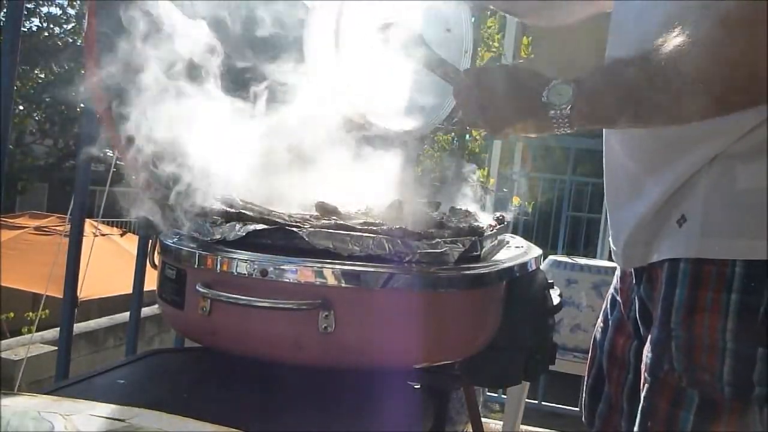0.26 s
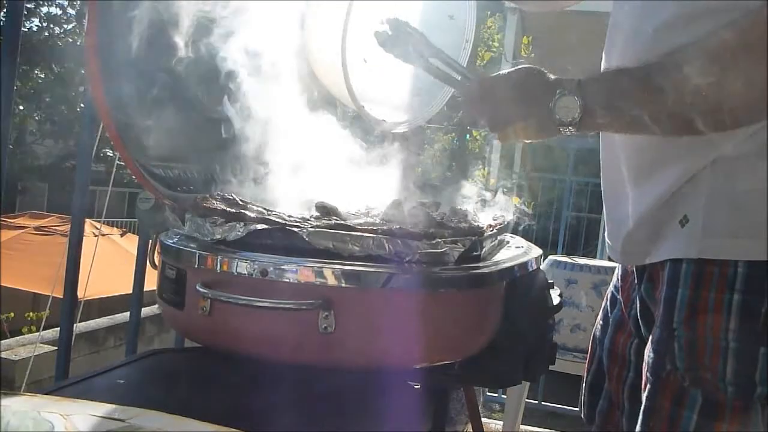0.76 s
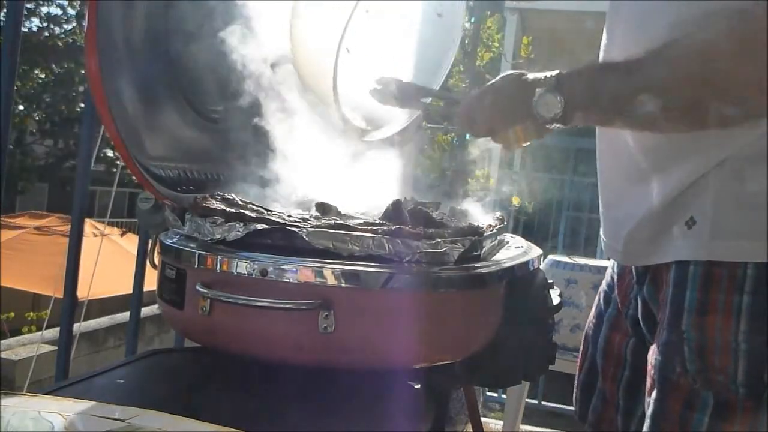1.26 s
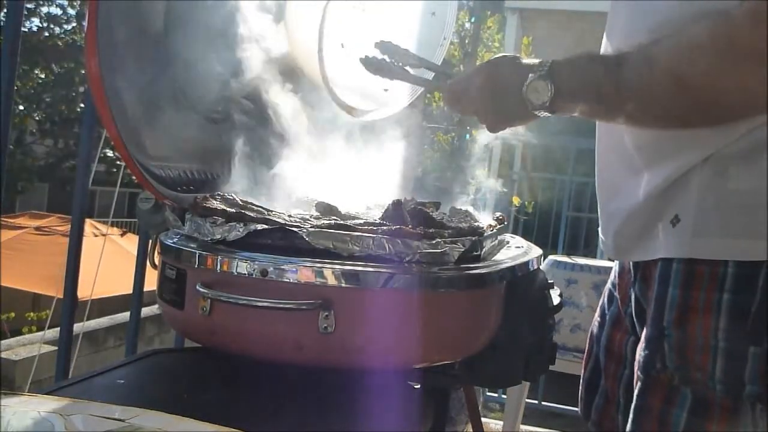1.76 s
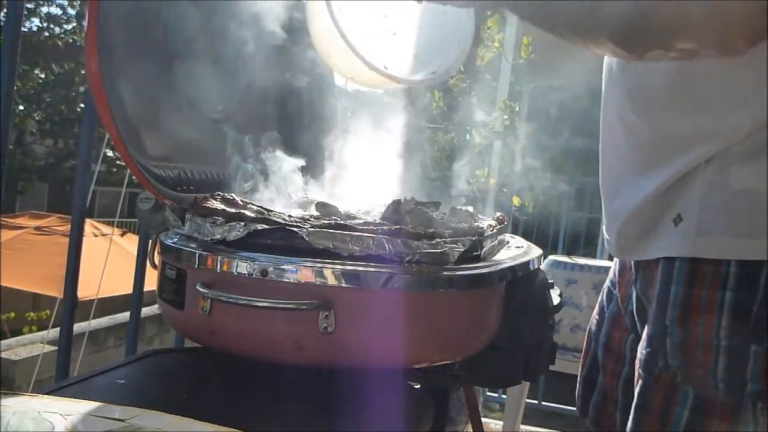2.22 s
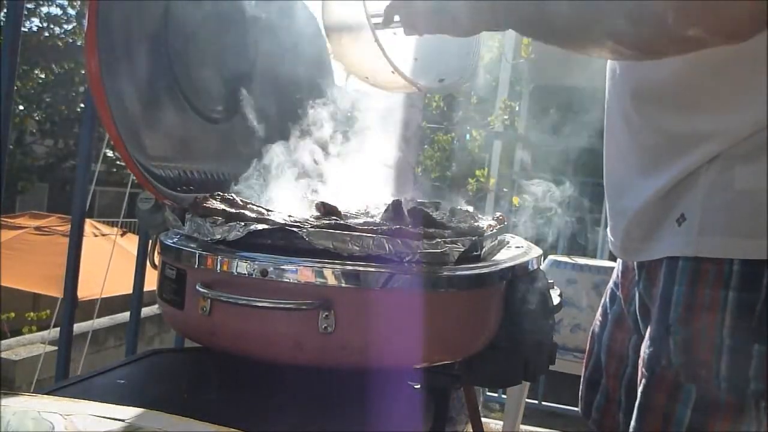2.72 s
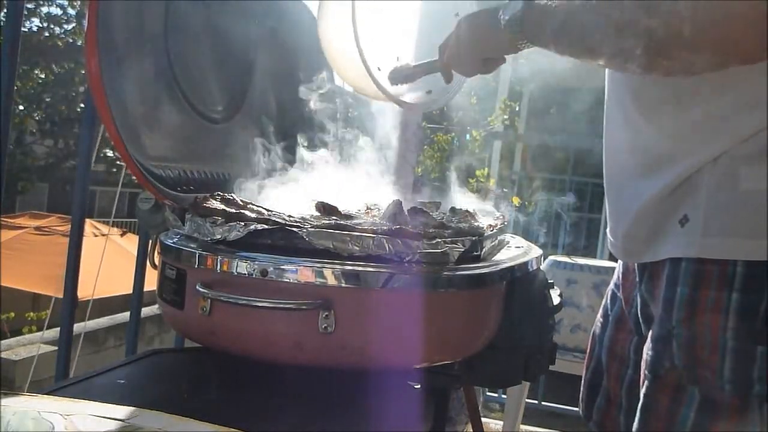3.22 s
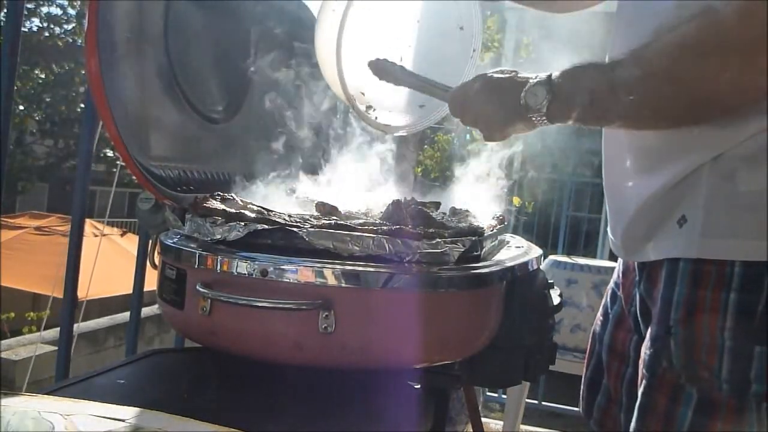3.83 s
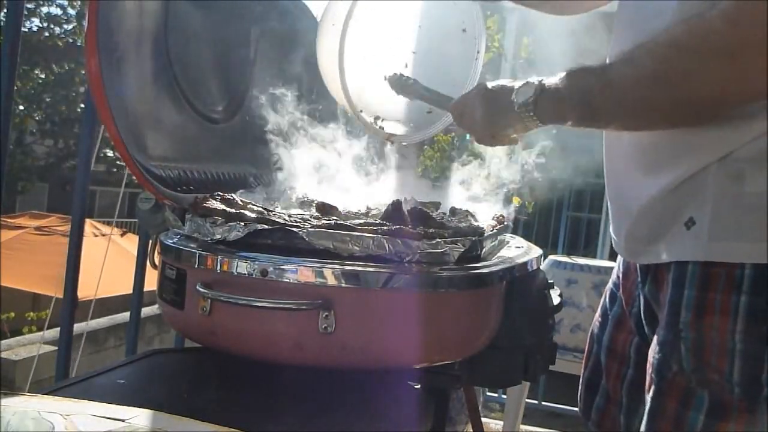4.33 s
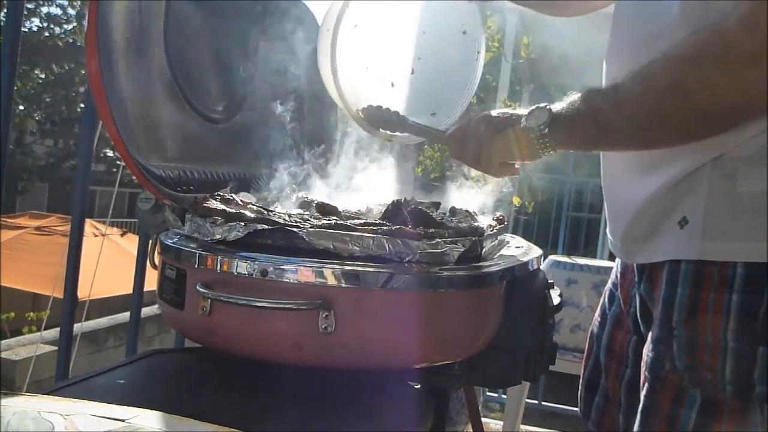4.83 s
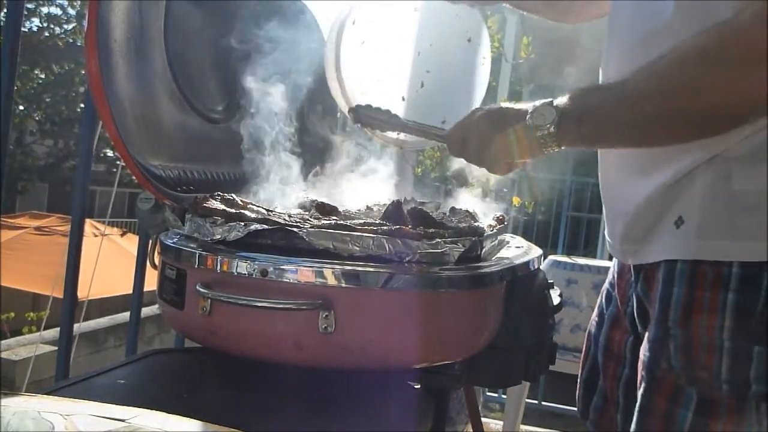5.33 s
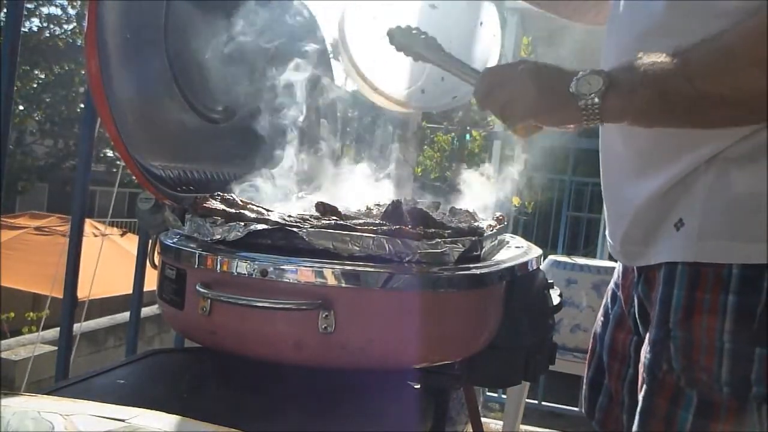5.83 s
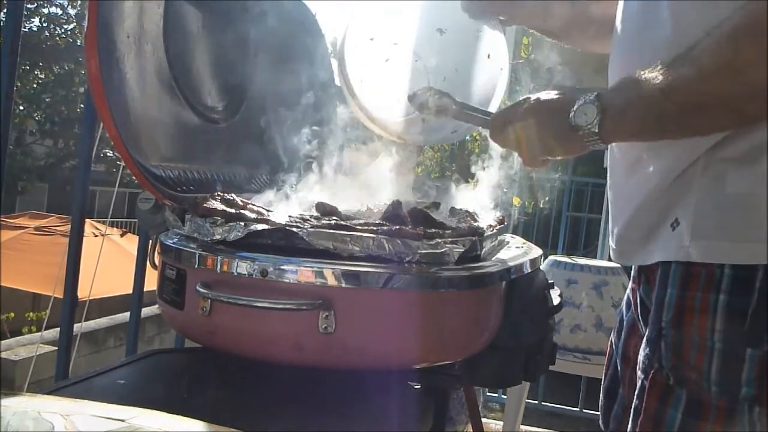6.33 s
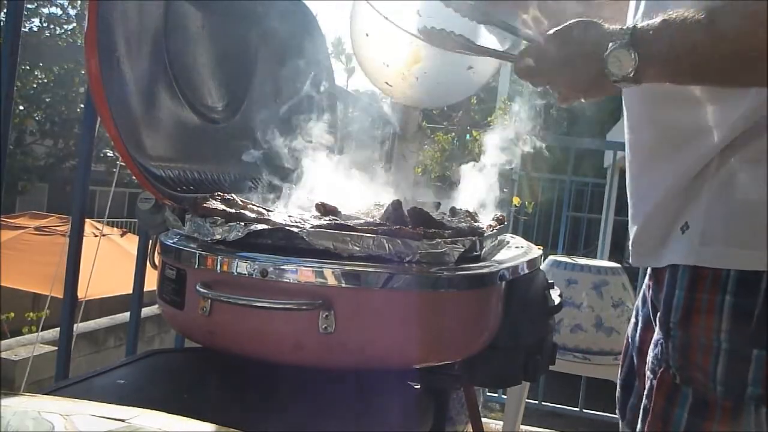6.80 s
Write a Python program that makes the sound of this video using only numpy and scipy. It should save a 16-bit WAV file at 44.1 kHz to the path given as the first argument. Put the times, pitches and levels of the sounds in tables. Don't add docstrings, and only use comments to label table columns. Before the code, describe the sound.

Outdoors beside a hissing grill, a plastic bowl is knocked empty with metal tongs. Hard dry clacks with a short hollow ring open, sparser dull drum-like taps and light steel clicks fill the middle, and irregular knocks return, ending with two strong hits. Close camera sound, short balcony reflections, faint high whine, and background hiss dipping slightly after the loudest blows.

```python
import sys
import numpy as np
from scipy import signal
from scipy.fft import rfft, irfft, next_fast_len
from scipy.io import wavfile
from scipy.ndimage import uniform_filter1d

SR = 44100
rng = np.random.default_rng(int(sys.argv[2]) if len(sys.argv) > 2 else 0)


def put_to_file(sound):
    columns = np.atleast_2d(sound).T
    safe = np.clip(columns, -1, 1)
    whole_steps = np.round(safe * 32767)
    wavfile.write(sys.argv[1], SR, whole_steps.astype(np.int16))


def invert_db(x):
    u = np.asarray(x, float) / 20
    return 10 ** u


N = 311346
STRIKE_TIME = np.arange(SR // 4) / SR
HARD_DB = -21.5

# start_s [s], strength_db [dB], ring_db [dB], ring_hz [Hz], clack_hz [Hz]
WALL_RAPS = [(0.5681, -11.5, -8.5, 1144, 1510), (0.828, -11.5, -19, 1239, 1550),
             (1.0212, -16.5, -15.5, 1160, 1480), (1.2316, -12, -21.5, 1125, 2040),
             (1.4869, -11, -26.5, 1033, 1880), (4.3298, -16, -14.5, 1218, 1490),
             (4.368, -21.5, -40, 1190, 2040), (4.7492, -18.5, -16, 1187, 2490),
             (4.8695, -31, -33.5, 1203, 2100), (4.8873, -25.5, -25, 1130, 2000),
             (5.3204, -21.5, -26.5, 1164, 2100), (5.5756, -15, -24, 1117, 2080),
             (5.6557, -31, -31, 1150, 1470), (5.683, -22, -25, 1190, 1615), (6.2834, -10, -9, 989, 1980),
             (6.2904, -28, -23, 1096, 1990), (6.5131, -13, -13, 1226, 1450)]
# start_s [s], boom_db [dB], boom_hz [Hz], body_db [dB], body_hz [Hz]
BOTTOM_ANSWERS = [(0.568, -16, 366, -18, 606), (0.83, -15.5, 367, -21, 587), (1.02, -18.5, 378, -20.5, 630),
                  (1.231, -13, 484, -17, 658), (1.487, -17.5, 360, -18.5, 580), (4.331, -22, 366, -23, 570),
                  (4.75, -25.5, 375, -20.5, 653), (4.87, -27.5, 497, -29, 510), (5.323, -50, 495, -27, 498),
                  (5.576, -20.5, 523, -17.5, 494), (5.682, -32.5, 397, -30, 484),
                  (6.286, -21, 517, -13.5, 744), (6.513, -17, 363, -18.5, 650)]
# start_s [s], strength_db [dB], clack_db [dB], boom_db [dB], boom_hz [Hz]
BOTTOM_TAPS = [
    (2.2776, -29.5, -39, -32.5, 399),
    (2.4, -26.5, -50, -20, 490),
    (2.7528, -26, -31, -18, 403.6),
    (3.021, -18, -38, -20, 381),
    (3.619, -34, -27.5, -24.5, 377.4),
    (3.949, -14, -27.5, -16, 395),
    (5.246, -21.5, -43, -21, 500),
]
# start_s [s], boom_db [dB], boom_hz [Hz]
FURTHER_BOOMS = [
    (0.865, -32, 392),
    (1.525, -29, 382),
    (2.7544, -13, 490),
    (2.766, -20.5, 421),
    (3.083, -35, 406),
    (3.655, -30, 394),
    (4.366, -25, 404),
    (4.399, -30, 389),
    (6.809, -25.5, 398),
]
# start_s [s], peak_db [dB]
AIR_PUSHES = [
    (2.396, -21.5),
    (3.019, -17),
    (3.619, -31),
    (3.95, -31),
]
# start_s [s], peak_db [dB]
TIP_CLICKS = [(0.8404, -30), (1.4964, -53), (3.9615, -30), (0.852, -28), (1.506, -41), (1.667, -40),
              (2.0225, -28), (2.08, -34.5), (2.392, -22), (2.765, -27.5), (3.1736, -23), (3.9828, -32),
              (5.0223, -26.5), (5.2474, -32.5), (5.3325, -28.5), (5.5857, -21.5)]
# start_s [s], level_db [dB], pitch_hz [Hz], t60_s [s]
SINGING_TONES = [
    (0.57, -42, 1660, 0.97),
    (1.024, -41, 1620, 0.23),
    (6.286, -6, 1102, 0.12),
]

# multiple of body_hz [ratio], level_db [dB], t60_s [s]
BODY_MODES = [(.86, -3.5, 0.025), (0.999, 1.5, 0.037), (1.2, -6.5, 0.044), (1.45, -13.5, 0.057)]
# multiple of ring_hz [ratio], level_db [dB], t60_s [s]
WALL_MODES = [(.86, -23.5, 0.015), (0.931, -5.5, 0.037), (0.998, -3.5, 0.075), (1.011, -22, 0.21),
              (1.084, -22, 0.3), (1.17, -10.5, 0.029), (1.27, -33, 0.02)]
# pitch_hz [Hz], level_db [dB], t60_s [s]
CLACK_MODES = [(1450, -6, 0.14), (1655, 0, 0.027), (1905, -2, 0.03), (1960, -6.5, 0.088),
               (2100, 0.5, 0.014), (2170, -5.5, 0.12), (2440, -8, 0.046), (2555, 2, 0.03),
               (2667, 1.5, 0.012)]
# pitch_hz [Hz], level_db [dB], t60_s [s]
AIR_MODES = [(214, -8, 0.061), (301, 3.5, 0.023)]
# pitch_hz [Hz], level_db [dB], t60_s [s]
STEEL_MODES = [(2490, -5, 0.0086), (3230, -4, 0.024), (4430, -8, .012), (5785, -2.5, 0.017),
               (7000, -1.5, 0.016), (8280, -5.5, 0.0086), (10100, -1.5, 0.012), (12800, 1, .008),
               (13500, -4, .006), (15300, -10, .006)]
# boom_hz [Hz], t60_s [s]
BOOM_DECAY = [(360, 0.076), (395, 0.12), (430, 0.059), (495, 0.039)]

# frequency_hz [Hz], density_db [dB per Hz]
CRACK_COLOUR = [(150, 2), (600, -9), (2500, 1.5), (4000, -6), (5500, -1.5), (8000, -19), (16500, -12.5)]
# frequency_hz [Hz], density_db [dB per Hz]
TICK_COLOUR = [(1000, -2), (3000, -4), (6000, -3), (16500, -6.5)]
# frequency_hz [Hz], density_db [dB per Hz]
RATTLE_COLOUR = [(4000, -43), (8000, 7.5), (10000, 3), (16500, -7.5)]
# frequency_hz [Hz], density_db [dB per Hz]
HISS_COLOUR = [(200, 3), (800, 9), (2600, 4.5), (5000, 1.5), (7000, -1.5), (10300, -2.5), (14500, -9.5),
               (17000, -5)]
# frequency_hz [Hz], density_db [dB per Hz]
TOWN_COLOUR = [(20, 0), (45, -1.5), (80, -7), (170, -1.5), (370, -3), (700, -8), (1500, -19), (4000, -31.5)]
# time_s [s], level_db [dB]
HISS_LEVEL = [(0, -47), (.47, -45.5), (1.5, -48), (2.5, -46.5), (4.15, -45), (7.06, -46)]

# frequency_hz [Hz], t60_s [s]
BALCONY_DECAY = [(200, 0.47), (1000, 0.2), (4000, 0.19), (12000, 0.14)]
# centre_hz [Hz], width_hz [Hz]
CAMERA_NOTCHES = [(2888, 170), (7845, 100), (11700, 1100)]
# pitch_hz [Hz], level_db [dB rms]
CAMERA_WHINE = [(7882, -68.5), (7912, -75), (7942, -77)]
# frequency_hz [Hz], gain_db [dB]
MIC_BAND = [(20, -36), (60, -12), (110, 0), (15720, 0), (15800, -6), (16050, -13), (16500, -15),
            (16760, -50)]


def bowl():
    track = np.zeros(N)
    boom_wet_db = -13
    tap_body_hz, tap_body_db = 490, -21
    for s, db, ring_db, ring_hz, clack_hz in WALL_RAPS:
        clack_db = 0.52 * db + 0.48 * ring_db - 1.5
        placed(track, s + 0.0006, ring(ring_db, ring_hz) + rap(db, clack_db, clack_hz))
        if db < HARD_DB:
            continue
        rebound = ring(ring_db, (ring_hz + 1175) / 2)
        rebound = rebound + rap(db - 32, clack_db - 7.5, 1620)
        placed(track, s + 0.011, rebound)
        placed(track, s + 0.00054, thump(db - 11.5))
    for s, db, hz, body_db, body_hz in BOTTOM_ANSWERS:
        placed(track, s, boom(db, hz, body_db, body_hz), boom_wet_db)
    for s, db, clack_db, boom_db, hz in BOTTOM_TAPS:
        placed(track, s + 0.0006, rap(db, clack_db, clack_hz=2270))
        placed(track, s + 0.001, boom(boom_db, hz, boom_db + tap_body_db, tap_body_hz), boom_wet_db)
    for s, db, hz in FURTHER_BOOMS:
        placed(track, s, boom(db, hz, db + tap_body_db, tap_body_hz), boom_wet_db)
    for s, db in AIR_PUSHES:
        placed(track, s + 0.002, thump(db))
    return track


def rap(crack_db, clack_db, clack_hz):
    clack = invert_db(clack_db - 13) * ringing(CLACK_MODES, scatter_db=4.5, attack=0.00015)
    spot = invert_db(clack_db - 0.5) * ringing([(clack_hz, 0, 0.03)], scatter_db=1.0, attack=0.00007)
    crack = burst(CRACK_COLOUR, 0.0099, 0.00016) + invert_db(-6.5) * burst(CRACK_COLOUR, 0.06, 0.0025)
    return clack + spot + invert_db(crack_db - 2.5) * crack + invert_db(clack_db + 4) * blow(0.00014)


def blow(width):
    u = STRIKE_TIME / width
    return -u * (2 - u) * np.exp(1 - u)


def ring(db, hz):
    return invert_db(db) * ringing(np.array(WALL_MODES) * [hz, 1, 1], scatter_db=2.0, attack=0.0006)


def boom(db, hz, body_db, body_hz):
    skin_modes = [(hz, -1.5, along(BOOM_DECAY, hz)), (0.796 * hz, -8, 0.03), (1.02 * hz, -7, 0.03)]
    skin = invert_db(db + 3.0) * ringing(skin_modes, scatter_db=1.25, attack=0.00076)
    body_modes = np.array(BODY_MODES) * [body_hz, 1, 1]
    return skin + invert_db(body_db + 3.0) * ringing(body_modes, scatter_db=1.0, attack=0.00022)


def thump(db):
    return invert_db(db + 3.0) * ringing(AIR_MODES, scatter_db=1.0, attack=0.0028)


def tongs():
    track = np.zeros(N)
    for s, db in TIP_CLICKS:
        snap = invert_db(3.0) * ringing(STEEL_MODES, scatter_db=2.5, attack=0.00024)
        snap = snap + burst(TICK_COLOUR, 0.011, 0.00026)
        snap = snap + invert_db(-6) * burst(TICK_COLOUR, 0.12, 0.0032)
        placed(track, s, invert_db(db - 8.0) * snap)
    for s, db, *_ in WALL_RAPS + BOTTOM_TAPS:
        if db > HARD_DB:
            grip_db = -7 if s < 4.2 else -7.5
            placed(track, s + 0.0003, rattle(db + grip_db))
    for s, db, hz, t60 in SINGING_TONES:
        add(track, s, ringing([(hz, db, t60)], scatter_db=0.3, attack=0.002, rough_db=0.8))
    return track


def rattle(db):
    noise = burst(RATTLE_COLOUR, 0.0082, 0.00019) + invert_db(-6.5) * burst(RATTLE_COLOUR, 0.052, 0.0025)
    steel = invert_db(-12) * ringing(STEEL_MODES, scatter_db=2.5, attack=0.0003)
    return invert_db(db - 5.5) * (noise + steel)


def ringing(modes, scatter_db, attack, rough_db=1.8):
    hz, db, t60 = np.transpose(modes)[:, :, None]
    sign_draw, level_draw = rng.standard_normal((2,) + hz.shape)
    knots = rng.standard_normal((len(hz), 32))
    knot_time = np.linspace(0, STRIKE_TIME[-1], 32)
    waver = np.array([np.interp(STRIKE_TIME, knot_time, k) for k in knots])
    level = invert_db(db + scatter_db * level_draw + rough_db * waver - 60 * STRIKE_TIME / t60)
    phase = 2 * np.pi * hz * STRIKE_TIME + 0.2 * waver[::-1]
    partials = np.sign(sign_draw) * level * np.sin(phase)
    return partials.sum(axis=0) * (1 - np.exp(-STRIKE_TIME / attack))


def burst(colour, t60, attack):
    noise = filtered(rng.standard_normal(len(STRIKE_TIME)), lambda hz: invert_db(along(colour, hz)))
    return unit(noise) * invert_db(-60 * STRIKE_TIME / t60) * (1 - np.exp(-STRIKE_TIME / attack))


def placed(track, s, sound, wet_db=-8.0):
    add(track, s, sound)
    add(track, s + 0.0098, invert_db(-18) * sound)
    add(track, s + 0.004, invert_db(wet_db) * signal.fftconvolve(sound, echo_tail()))


def echo_tail():
    hz, t, z = signal.stft(rng.standard_normal(len(STRIKE_TIME)), SR, nperseg=256)
    decay = invert_db(-60 * t / along(BALCONY_DECAY, hz)[:, None])
    tail = signal.istft(z * decay, SR, nperseg=256)[1]
    return tail / np.linalg.norm(tail)


def grill():
    t = np.arange(N) / SR
    sag_db = np.zeros(N)
    for s, db, ring_db, *_ in WALL_RAPS:
        excess_db = max(0, max(db, ring_db) + 17)
        sag_db += 0.23 * excess_db * (t > s) * np.exp(-np.abs(t - s) / 0.87)
    town = invert_db(-41.5) * rush(TOWN_COLOUR, patchy_db=0.4)
    hiss_db = np.interp(t, *np.transpose(HISS_LEVEL)) + 2.0
    hiss = invert_db(hiss_db) * rush(HISS_COLOUR, patchy_db=1.55)
    return invert_db(-sag_db) * (town + hiss)


def rush(colour, patchy_db):
    z = signal.stft(rng.standard_normal(N + 512), nperseg=512)[2]
    field = uniform_filter1d(rng.standard_normal(z.shape), size=6, axis=0)
    field = uniform_filter1d(field, size=10, axis=1)
    noise = signal.istft(z * invert_db(patchy_db * unit(field)), nperseg=512)[1][:N]
    return unit(filtered(noise, lambda hz: invert_db(along(colour, hz))))


def add(track, s, sound):
    at = round(s * SR)
    track[at:at + len(sound)] += sound[:len(track) - at]


def unit(x):
    return x / np.sqrt(np.mean(x ** 2) + 1e-20)


def along(points, hz):
    f, v = np.transpose(points)
    return np.interp(np.log(hz + 1), np.log(f + 1), v)


def filtered(x, response):
    m = next_fast_len(len(x) + 8192)
    return irfft(rfft(x, m) * response(np.fft.rfftfreq(m, 1 / SR)), m)[:len(x)]


def scene():
    return (bowl() + tongs() + grill())[None]


def camera_notches(f):
    response = 1
    for centre, width in CAMERA_NOTCHES:
        off = centre * centre - f * f
        response = response * (off + 0.05j * f * width) / (off + 1j * f * width)
    return response


def camera_whine():
    t = np.arange(N) / SR
    return sum(np.sqrt(2) * invert_db(db) * np.sin(2 * np.pi * hz * t) for hz, db in CAMERA_WHINE)


def loud_top_only(x):
    top = filtered(x, lambda hz: hz > 15760)
    strong = np.abs(uniform_filter1d(top ** 2, size=200)) > invert_db(2 * -48)
    return x - top * (1 - uniform_filter1d(strong * 1.0, size=60))


def band_limit(x):
    return signal.sosfilt(signal.butter(12, 16810, fs=SR, output="sos"), x)


def record(dry):
    x = filtered(dry[0], camera_notches) + camera_whine()
    x = x / (1 + np.abs(x) ** 6) ** (1 / 6)
    x = filtered(loud_top_only(x), lambda hz: invert_db(along(MIC_BAND, hz)))
    return band_limit(x[None])


dry = scene()
out = record(dry)
put_to_file(out)
```